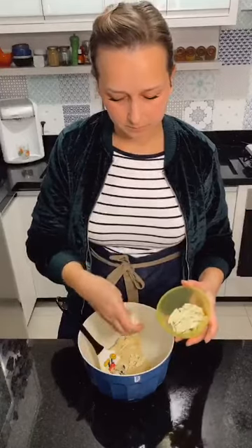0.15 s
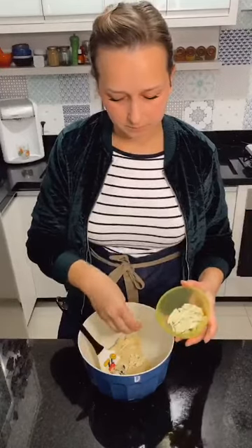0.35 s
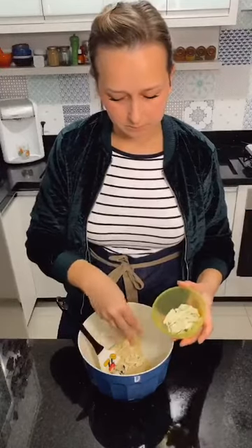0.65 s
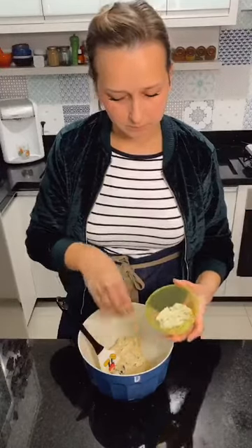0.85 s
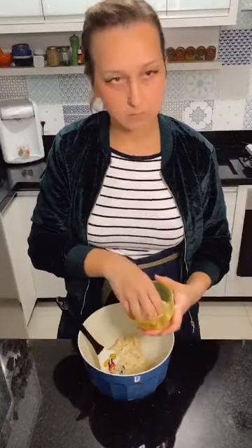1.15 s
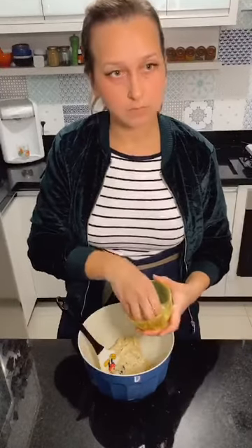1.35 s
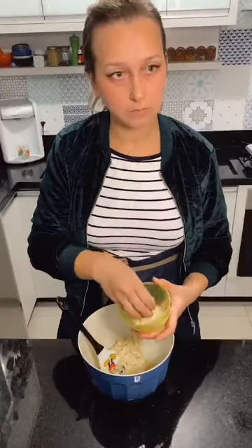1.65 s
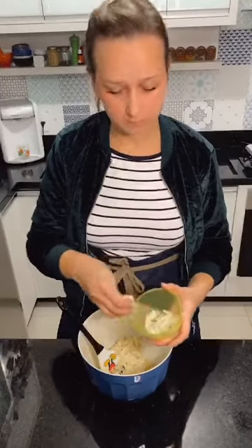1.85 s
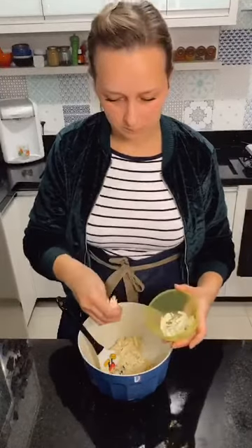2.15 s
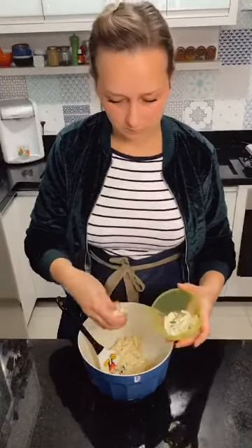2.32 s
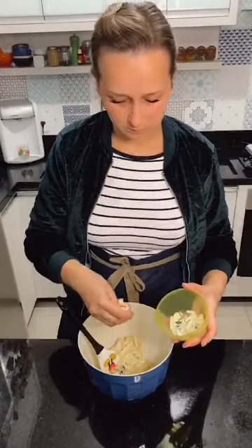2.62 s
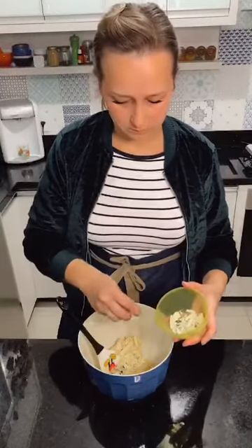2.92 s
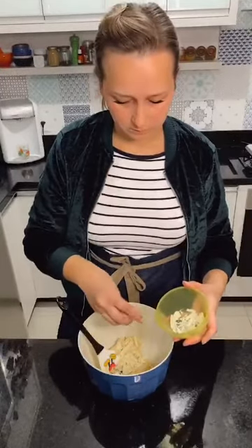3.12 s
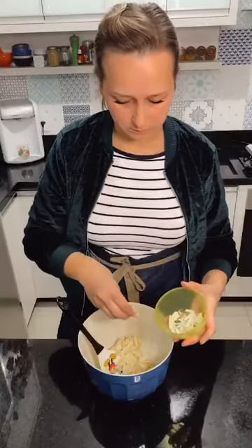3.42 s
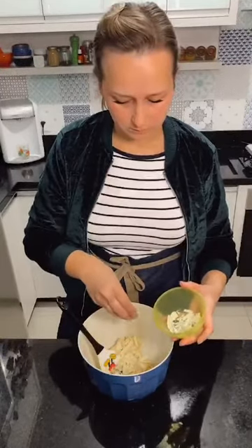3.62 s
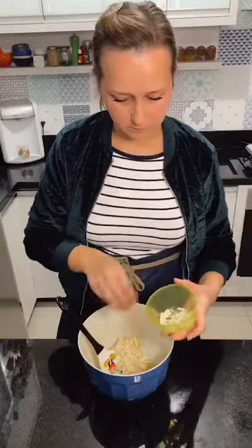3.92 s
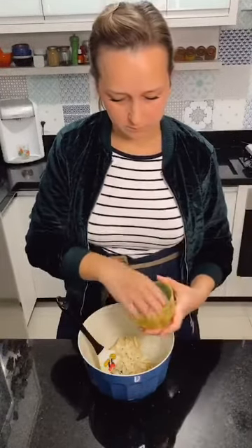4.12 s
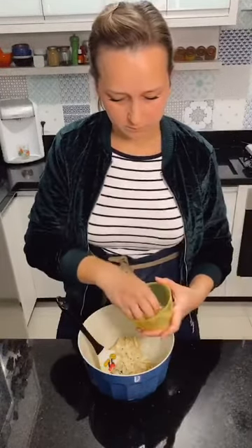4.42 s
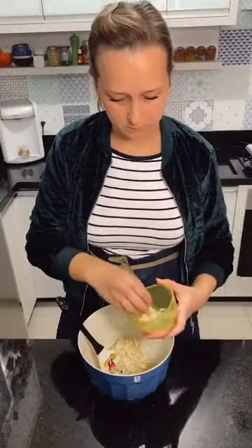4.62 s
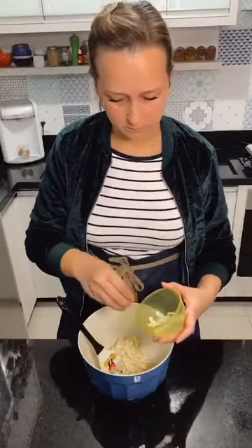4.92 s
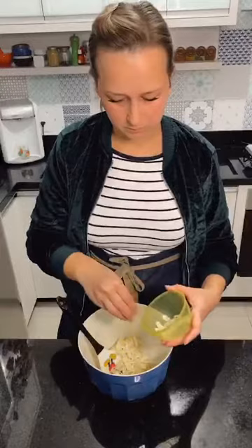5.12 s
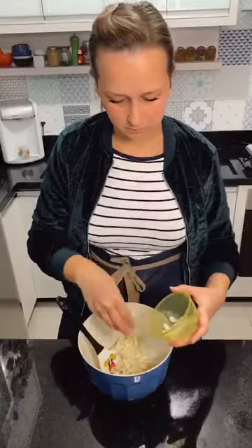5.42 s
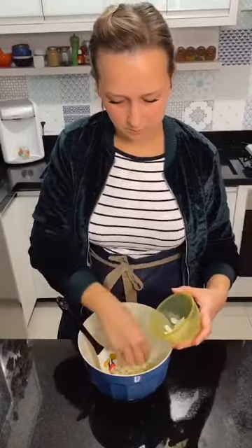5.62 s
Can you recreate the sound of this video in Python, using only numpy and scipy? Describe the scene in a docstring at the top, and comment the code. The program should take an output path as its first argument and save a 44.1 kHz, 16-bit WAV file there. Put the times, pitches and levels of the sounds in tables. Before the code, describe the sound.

In a quiet kitchen, chocolate is broken by hand with small crisp snaps, and pieces click into a mixing bowl. Fingers rummage in a plastic cup, knocking and scraping pieces against its dull wall. More scattered snaps and landings follow, then a second dig and a sharp final clack. A sleeve swishes softly now and then. The nearby microphone also picks up a low drone and thin hiss.

```python
"""White chocolate snapped by hand over a mixing bowl in a tiled kitchen, on a bed of low drone and thin hiss.
A sleeve swishes, fingertips rub, chocolate cracks, and near 0.9 s pieces click into the bowl.
At 1.2 s the fingers rummage in a plastic cup, and pieces knock and scrape its dull-ringing wall.
Scattered snaps follow, with swells of deep rumble from 3 s on; the sleeve flaps and more pieces land
before a second dig at 4.2 s. The loudest landing, a sharp clack, comes near 5.5 s between two swishes."""
import sys
import numpy as np
from scipy import signal
from scipy.fft import rfft, irfft
from scipy.io import wavfile
from scipy.ndimage import uniform_filter1d

SR = 44100
rng = np.random.default_rng(int(sys.argv[2]) if len(sys.argv) > 2 else 0)


def store_wav(level_fs):
    """Save 16-bit WAV to argv[1]."""
    pcm = np.round(np.clip(np.atleast_2d(level_fs), -1, 1) * 32767)
    wavfile.write(sys.argv[1], SR, pcm.T.astype(np.int16))


N = 254236
TAPS = 4096  # samples in a click
HZ = np.fft.rfftfreq(TAPS, 1 / SR)

# Table levels are relative: each layer sets its own trim.
# EQ curves of the room's drone, hiss and rumble (frequency [Hz], level [dB])
DRONE_EQ = [(20, -28), (40, -18), (62, -1.5), (78, 3), (97, 2), (125, 1.5), (160, -12), (220, -10.5),
            (300, -16), (450, -14.5), (900, -20.5), (2000, -26.5), (3800, -31), (6500, -30.5),
            (9500, -39.5), (16000, -43)]
HISS_EQ = [(2500, -30), (3900, -11), (4600, -5.5), (5250, -0.5), (5750, -4), (6400, -28), (9000, -57)]
RUMBLE_EQ = [(22, -30), (35, -8.5), (70, -7), (110, -22), (300, -42), (16000, -90)]
# swells of rumble (peak time [s], rise [s], fall [s], level [dB])
RUMBLE_SWELLS = [(3.08, 0.043, 0.2, -46), (3.66, 0.34, 0.22, -59), (4.55, 0.18, 0.16, -65),
                 (5.05, 0.069, 0.13, -50), (5.66, 0.21, .25, -51)]
# the kitchen's reverb tail (frequency [Hz], time to fall 60 dB [s])
REVERB_DECAY = [(200, 0.38), (1200, 0.52), (3500, 0.45), (8000, 0.39), (15000, 0.17)]
# early reflections (delay [ms], gain [ratio])
REFLECTIONS = [(1.3, 0.2), (3.6, 0.35), (7.8, 0.4), (15.2, 0.22), (24.5, 0.21)]
# EQ curve of skin on chocolate (frequency [Hz], level [dB])
RUB_EQ = [(300, 3), (2000, -3), (4000, -5.5), (8000, 0.5), (11000, -6), (16000, -7)]
# fingertip strokes (peak time [s], rise [s], fall [s], level [dB])
RUB_STROKES = [(0.40, .15, 0.38, -67.5), (0.97, 0.16, 0.14, -58.5), (1.38, 0.22, 0.19, -57),
               (2.2, 0.15, 0.36, -68.5), (3.16, 0.15, 0.18, -60.5), (3.55, .2, 0.19, -66.5),
               (3.92, 0.29, 0.12, -63), (4.48, 0.64, 0.17, -56), (5.2, 0.38, .25, -60.5),
               (5.6, 0.16, 0.11, -56)]
# EQ curves of the cloth's low flap and airy swish (frequency [Hz], level [dB])
FLAP_EQ = [(50, -17), (110, 3), (240, -5.5), (480, -5.5), (700, -24.5), (1200, -15), (3000, -32),
           (16000, -60)]
SWISH_EQ = [(200, -9), (900, -5), (1300, 4.5), (2500, 1.5), (4500, 5.5), (6500, -1.5), (8500, -5),
            (11000, -12.5), (16000, -8)]
# arm moves (time of top speed [s], speeding up [s], slowing down [s], flap [dB], swish [dB])
SLEEVE_MOVES = [(0.188, 0.097, 0.13, -48.5, -45.5), (3.74, 0.17, .12, -72, -66),
                (3.93, 0.053, 0.052, -46.5, -51), (5.17, 0.098, 0.12, -60, -54.5),
                (5.56, 0.11, 0.21, -56, -51.5)]
# modes of the plastic cup (frequency [Hz], width [Hz], level [dB])
CUP_MODES = [(636, 84, -11), (847, 99, -1), (1020, 96, 2.5), (1120, 166, 6), (1274, 94, -1),
             (2310, 510, -4.5), (3580, 290, -13)]
# EQ curves of chocolate scratching plastic and of the hand's thud (frequency [Hz], level [dB])
SCRATCH_EQ = [(200, -39), (1500, 6.5), (2500, 0.5), (4500, 2), (7000, -7), (10000, -16.5), (16000, -21)]
THUD_EQ = [(40, -4), (150, 2), (260, -3), (500, 4), (800, -3), (3000, -9), (16000, -77)]
# digs into the cup (fingers enter [s], close [s], lift out [s], cup ring [dB], scratch [dB])
CUP_DIGS = [(1.188, 1.38, 1.777, -42.5, -46), (4.212, 4.347, 4.54, -42, -49.5)]
# pieces hitting the cup (time [s], level [dB], sharp click [dB], hand thud [dB])
CUP_KNOCKS = [(1.187, -57, 0.5, -10), (1.2, -48, -4, -7.5), (1.272, -51, -18, -22),
              (1.335, -47.5, -26, -29), (1.41, -39.5, -20, -30), (1.422, -32, -17, -22.5),
              (1.54, -37.5, -15.5, -30), (1.618, -40, -29.5, -21), (1.663, -51, -17, -25),
              (1.709, -46.5, -19, -13), (1.808, -49.5, -15, -13.5), (2.018, -56.5, -5, -29),
              (2.324, -57.5, -4, -15), (3.709, -58.5, -5.5, -18), (4.203, -51.5, -7, -7),
              (4.215, -49.5, -6.5, -19), (4.227, -43, -9.5, -14), (4.253, -54, -6, -11),
              (4.425, -45, -35, -20), (4.731, -54, -6.5, -9.5), (5.1, -54.5, -17, -13.5)]
# EQ curves of the crack, bright fizz and dull body of a snap or landing (frequency [Hz], level [dB])
CRACK_EQ = [(100, -43.5), (1500, -24.5), (2600, -13), (3200, 2.5), (4500, 5), (6500, -1), (8500, -12),
            (11000, -22), (16000, -27)]
FIZZ_EQ = [(100, -38), (3000, -15), (6500, 13.5), (9500, 12), (12000, 8), (16000, -3.5)]
BODY_EQ = [(60, -16.5), (350, 15), (700, 0.5), (1200, 13), (1800, -0.5), (2600, 10), (4500, 2),
           (16000, -34)]
# snaps, and landings in the bowl near 0.92, 3.95 and 5.47 s
# (time [s], level [dB], ring [Hz], fizz [dB], body [dB], burst decay [ms], reverb send [dB])
SNAPS_AND_LANDINGS = [(0.3323, -44.5, 3220, -27, -10, 2.8, -5), (0.3931, -46, 3360, -13, -24, 1.9, -1),
                      (0.4912, -30, 3550, -29, -13, 3.25, -2), (0.7916, -55.5, 5570, -6.5, 0.5, 2.3, 5.5),
                      (0.8697, -44, 8900, -9.5, -4, 1.7, 4.5), (0.918, -30.5, 3170, -19, -9, 2.7, 2),
                      (0.9362, -34.5, 3100, -4, -19, 3.8, -25), (0.9462, -40, 3180, -3.5, -20, 3.6, 4),
                      (1.9961, -41.5, 4340, -36, -1, 3.2, -5), (2.416, -53, 5000, -6.5, -0.5, 2.5, -1),
                      (2.7582, -41, 3720, -30, 0, 5.1, -2.5), (2.7684, -45, 2820, -38, 2, 1.9, -1),
                      (3.0088, -42, 8100, -12.5, -15, 2.66, -3), (3.1771, -36, 6280, -12, -24, 3.5, -2),
                      (3.2051, -39, 4940, -9, -32, 2.4, -2.5), (3.4855, -49, 5560, -19, -25, 2.4, 0),
                      (3.6306, -41, 3290, -20, -15, 2.8, 1), (3.9501, -31.5, 6550, -18, -30, 6, -17),
                      (3.964, -34.5, 8800, -15.5, -25, 2.9, 0), (3.974, -41, 5470, -20, -24, 1.2, -7),
                      (4.6359, -33.5, 3830, -23, -29, 2.3, -2.5), (4.657, -36, 5570, -15, -15, 2.7, -1.0),
                      (5.4124, -43, 3200, -10, -2.5, 2.7, -4.5), (5.467, -21, 8100, -8.5, -23, 2.9, -5)]


def amp(db):
    """Decibels to gain."""
    return 10 ** (np.asarray(db) / 20)


def unit_rms(x):
    """Scales to rms 1."""
    return x / np.sqrt(np.mean(x ** 2) + 1e-20)


def curve_at(points, hz):
    """Reads a curve on a log-frequency axis."""
    f, value = np.transpose(points)
    return np.interp(np.log(hz + 1), np.log(f + 1), value)


def add(mix, s, sound):
    """Mixes a sound in at time s."""
    part = mix[max(round(s * SR), 0):][:len(sound)]
    part += sound[:len(part)]


def equalise(x, eq):
    """Shapes a full-length layer with an EQ curve, at rms 1."""
    return unit_rms(irfft(rfft(x) * amp(curve_at(eq, np.fft.rfftfreq(N, 1 / SR))), N))


def impulse(gain):
    """The minimum-phase click that has this gain over HZ."""
    log_gain = np.log(np.concatenate([gain, gain[-2:0:-1]]) + 1e-9)
    return np.fft.ifft(np.exp(np.conj(signal.hilbert(log_gain)))).real


def click(eq):
    """A click coloured by an EQ curve, energy 1."""
    return impulse(unit_rms(amp(curve_at(eq, HZ))))


def low_noise(cutoff_hz):
    """Low-passed noise."""
    return signal.sosfilt(signal.butter(2, cutoff_hz, fs=SR, output="sos"), rng.standard_normal(N))


def grains(per_s, spread_db):
    """Tiny slips at random times; spread_db makes their sizes uneven."""
    size = amp(spread_db * np.minimum(rng.exponential(1, N), 4))
    return unit_rms(size * rng.choice([-1, 1], N) * (rng.random(N) < per_s / SR))


def burst(noise, decay_ms, rise_ms):
    """A cluster of micro-clicks that builds and dies within milliseconds, with a flat spectrum."""
    t_ms = np.arange(TAPS) / SR * 1000
    envelope = np.exp(-t_ms / decay_ms) * (1 - np.exp(-t_ms / rise_ms))
    spectrum = rfft(noise * abs(noise) * envelope)
    spectrum /= np.sqrt(uniform_filter1d(abs(spectrum) ** 2, size=120) + 1e-20)
    return irfft(unit_rms(spectrum))[:TAPS // 2]


def swell(s, rise_s, fall_s):
    """A smooth fader ride: 1 at time s, 10 dB down rise_s before and fall_s after."""
    t = np.arange(N) / SR - s
    return amp(-10 * np.minimum((t / np.where(t < 0, rise_s, fall_s)) ** 2, 20))


def room_tone(drone_db=-52, hiss_db=-63.5, rumble_trim_db=-2):
    """The bed: low drone, narrow hiss and a deep rumble that comes and goes."""
    drone, hiss, rumble = rng.standard_normal((3, N))
    steady = amp(drone_db) * equalise(drone, DRONE_EQ) + amp(hiss_db) * equalise(hiss, HISS_EQ)
    swells = sum(amp(db + rumble_trim_db) * swell(s, rise, fall) for s, rise, fall, db in RUMBLE_SWELLS)
    return steady + swells * equalise(rumble, RUMBLE_EQ)


def kitchen_reverb(send, tail_db=-1, build_ms=6):
    """Early reflections off the bowl, counter and tiles, then a dense tail that dies by band."""
    hz, t, bands = signal.stft(rng.standard_normal(SR // 2), SR, nperseg=256)
    decay = amp(-60 * t / curve_at(REVERB_DECAY, hz)[:, None])
    tail = signal.istft(bands * decay, SR)[1]
    t_ms = np.arange(len(tail)) / SR * 1000
    tail *= 1 - np.exp(-(t_ms / build_ms) ** 2)
    tail *= amp(tail_db) / np.linalg.norm(tail)
    for ms, gain in REFLECTIONS:
        tail[np.searchsorted(t_ms, ms)] += gain
    return signal.fftconvolve(send, tail)[:N]


def fingertips(trim_db=-5):
    """Skin and crumbs rub with a fine, faint grain."""
    strokes = sum(amp(db + trim_db) * swell(s, rise, fall) for s, rise, fall, db in RUB_STROKES)
    return strokes * equalise(grains(per_s=4000, spread_db=5), RUB_EQ)


def sleeve(flap_trim_db=-3, swish_trim_db=-7.5, flap_lead=0.58):
    """Cloth flaps as the arm speeds up, then swishes at top speed."""
    flap = equalise(rng.standard_normal(N), FLAP_EQ)
    swish = equalise(grains(per_s=6400, spread_db=5), SWISH_EQ)
    cloth = np.zeros(N)
    for s, rise, fall, flap_db, swish_db in SLEEVE_MOVES:
        cloth += amp(flap_db + flap_trim_db) * swell(s - flap_lead * rise, rise, fall) * flap
        cloth += amp(swish_db + swish_trim_db) * swell(s, rise, fall) * swish
    return cloth


def weave_zip(level_db=-64, rest_hz=11800, rise_hz=3020):
    """On the first arm move the weave gives a thin zip whose pitch rides the speed."""
    speed = np.sqrt(swell(*SLEEVE_MOVES[0][:3]))
    cycles = np.cumsum(rest_hz + rise_hz * speed) / SR
    band = low_noise(cutoff_hz=1300) * np.cos(2 * np.pi * cycles)
    return amp(level_db) * speed ** 2 * unit_rms(band)


def cup_ring():
    """The cup wall's dull ring after one tap, energy 1."""
    t = np.arange(TAPS) / SR
    ring = sum((-1) ** k * amp(db) * np.exp(-np.pi * width * t) * np.sin(2 * np.pi * hz * t)
               for k, (hz, width, db) in enumerate(CUP_MODES))
    return ring / np.linalg.norm(ring)


def finger_pressure(enter_s, close_s, lift_s, attack_s=0.0083, grip_boost_db=5, release_db_per_s=144):
    """Envelope of one dig: a light search, a firm hold, a fade as the fingers lift."""
    t = np.arange(N) / SR
    entered, closed = (np.clip((t - s) / attack_s, 0, 1) for s in (enter_s, close_s))
    release_db = release_db_per_s * np.clip(t - lift_s, 0, 1)
    return entered * amp(grip_boost_db * (closed - 1.5) - release_db)


def rummage(ring_trim_db=-14, scratch_trim_db=-7, tumble_db=-6):
    """Pieces slip in fits over each other and along the cup wall; some tumble against it."""
    slips = grains(per_s=1200, spread_db=-0.5)
    tumbles = amp(tumble_db) * grains(per_s=70, spread_db=0)
    flutter_db = unit_rms(low_noise(cutoff_hz=25))
    contacts = (slips + tumbles) * amp(flutter_db)
    ring = unit_rms(signal.oaconvolve(contacts, cup_ring())[:N])
    scratch = equalise(contacts, SCRATCH_EQ)
    out = np.zeros(N)
    for enter, close, lift, ring_db, scratch_db in CUP_DIGS:
        texture = amp(ring_db + ring_trim_db) * ring + amp(scratch_db + scratch_trim_db) * scratch
        out += finger_pressure(enter, close, lift) * texture
    return out


def cup_knocks(trim_db=11, tick_trim_db=7, thud_trim_db=10):
    """Pieces hit the cup: a sharp click on top, the wall's ring, the hand's thud underneath."""
    out = np.zeros(N)
    ring, tick, thud = cup_ring(), click(SCRATCH_EQ), click(THUD_EQ)
    for s, db, tick_db, thud_db in CUP_KNOCKS:
        contact = burst(rng.standard_normal(TAPS), decay_ms=1.16, rise_ms=0.093)
        tone = ring + amp(tick_db + tick_trim_db) * tick + amp(thud_db + thud_trim_db) * thud
        add(out, s, amp(db + trim_db) * signal.fftconvolve(contact, tone))
    return out


def snaps_and_landings(trim_db=-6, ring_boost=1.44, ring_width_hz=560):
    """Chocolate cracks or clicks into the bowl; the small piece rings, radiating little bass."""
    direct, send = np.zeros((2, N))
    crack = amp(curve_at(CRACK_EQ, HZ))
    for s, db, ring_hz, fizz_db, body_db, decay_ms, send_db in SNAPS_AND_LANDINGS:
        resonance = 1 + ring_boost / (1 + (2 * (HZ - ring_hz) / ring_width_hz) ** 2)
        fizz = amp(fizz_db + curve_at(FIZZ_EQ, HZ))
        body = amp(body_db + curve_at(BODY_EQ, HZ))
        tone = resonance * np.sqrt(crack ** 2 + fizz ** 2 + body ** 2)
        tone /= np.sqrt(np.mean((resonance * crack) ** 2))  # the crack sets the level; the rest adds on
        transient = burst(rng.standard_normal(TAPS), decay_ms, rise_ms=0.38)
        hit = amp(db + trim_db) * signal.fftconvolve(transient, impulse(tone))
        add(direct, s, hit)
        add(send, s, amp(send_db) * hit)
    return direct, send


def scene():
    """Mono mix: chocolate and handling up front, the kitchen around them, room tone underneath."""
    chocolate, reverb_send = snaps_and_landings()
    handling = cup_knocks() + rummage() + sleeve() + weave_zip() + fingertips()
    return (chocolate + handling + kitchen_reverb(reverb_send + handling) + room_tone())[None]


def record(dry):
    """A steep high cut on the master."""
    cutoff_hz = 15850
    high_cut = signal.firwin(511, cutoff_hz, window=("kaiser", 9), fs=SR)
    return signal.oaconvolve(dry, high_cut[None], "same")


dry = scene()
out = record(dry)
store_wav(out)
```